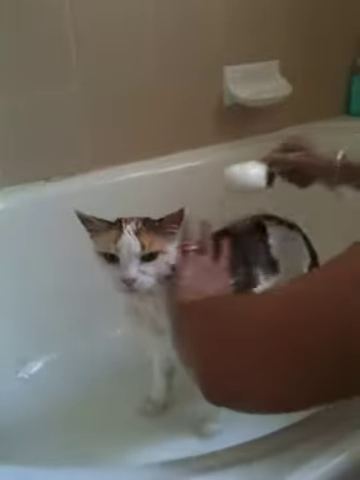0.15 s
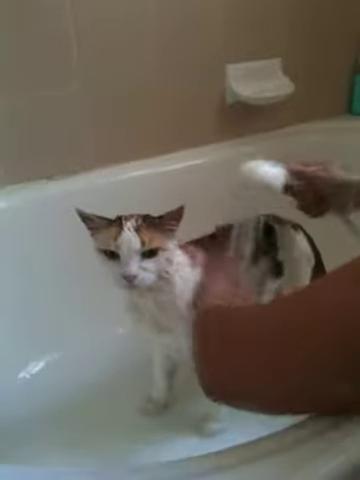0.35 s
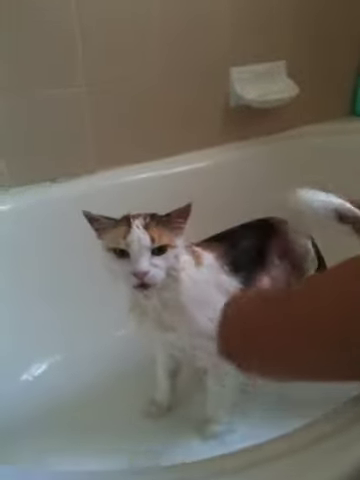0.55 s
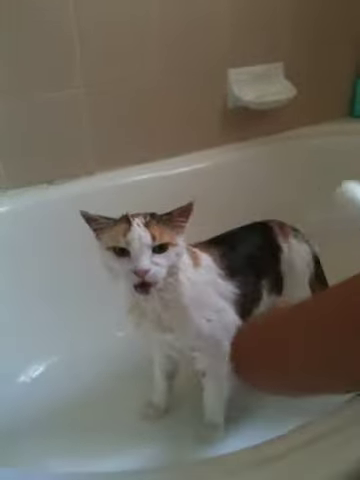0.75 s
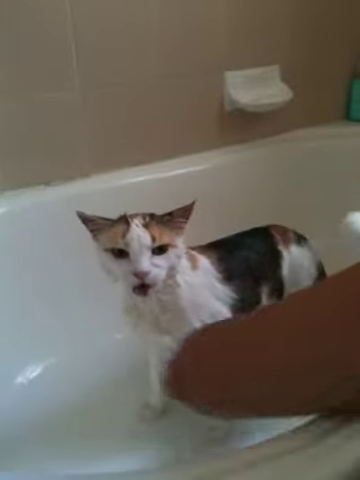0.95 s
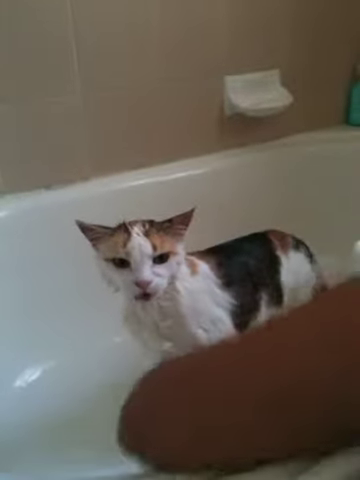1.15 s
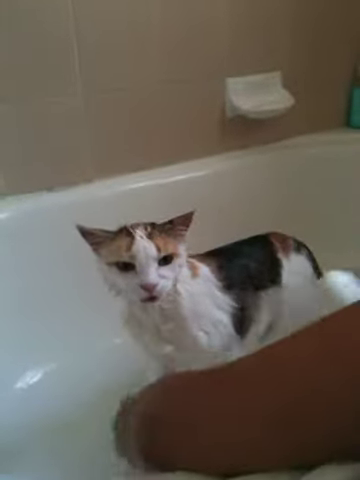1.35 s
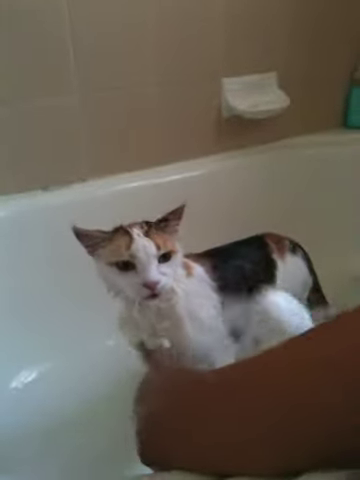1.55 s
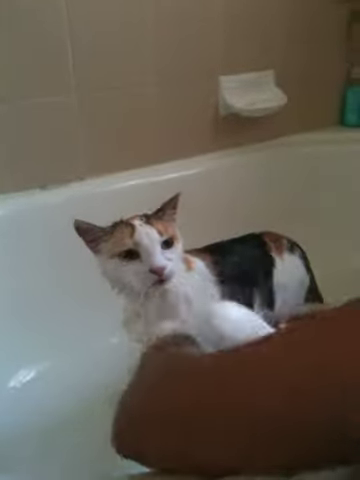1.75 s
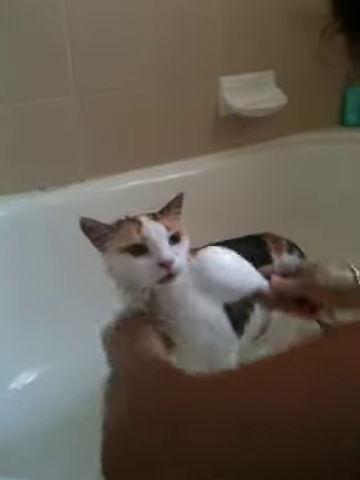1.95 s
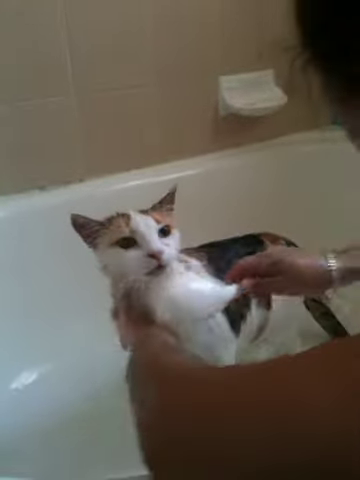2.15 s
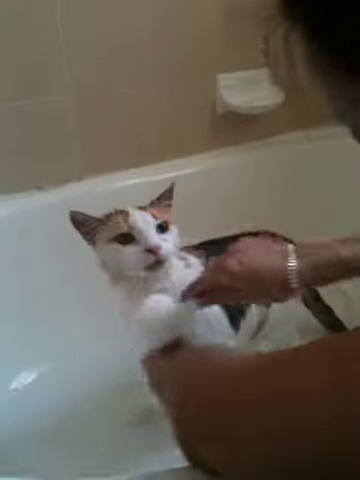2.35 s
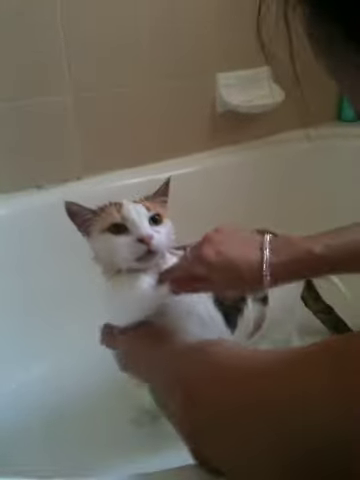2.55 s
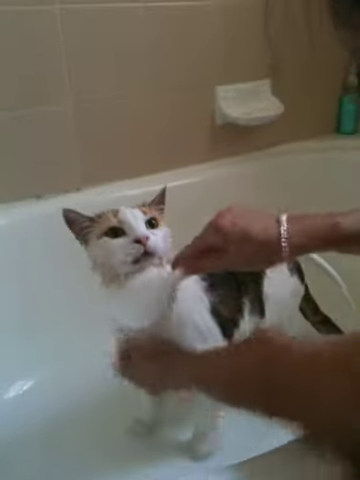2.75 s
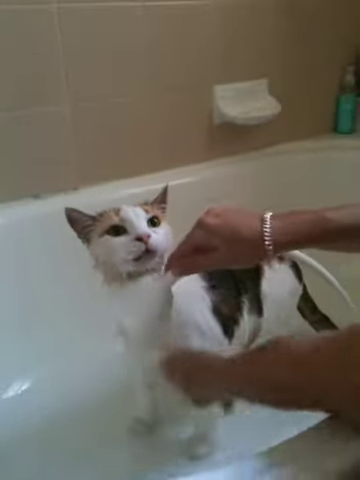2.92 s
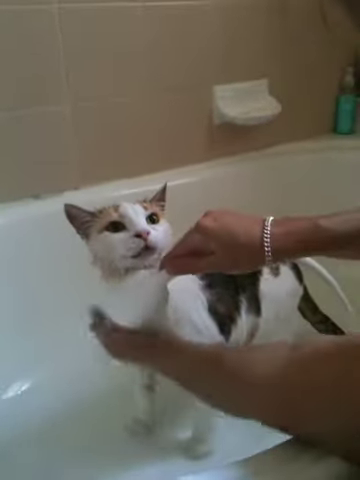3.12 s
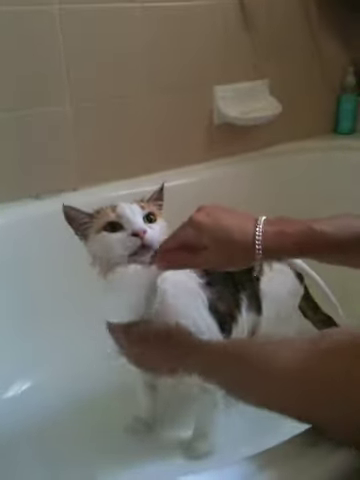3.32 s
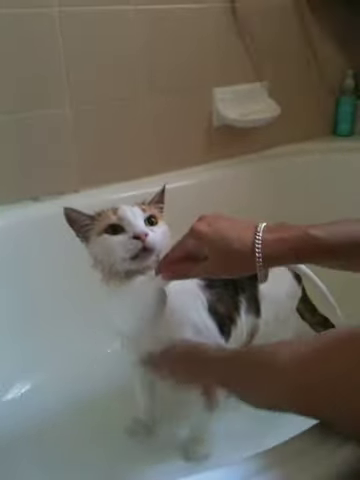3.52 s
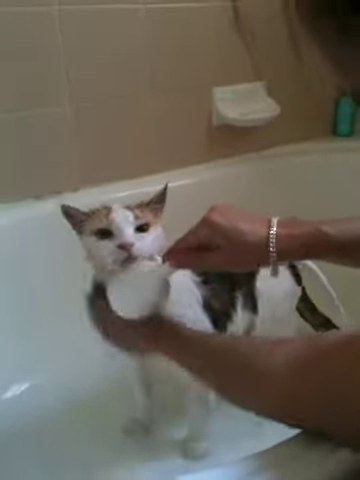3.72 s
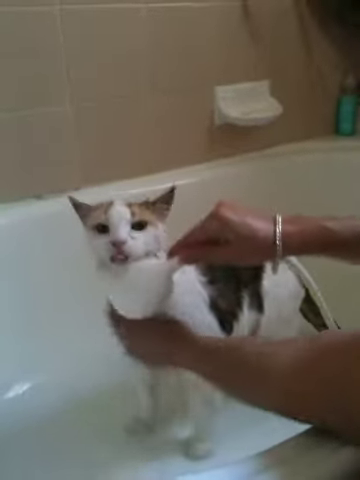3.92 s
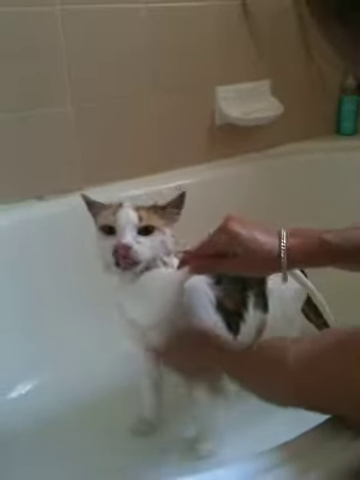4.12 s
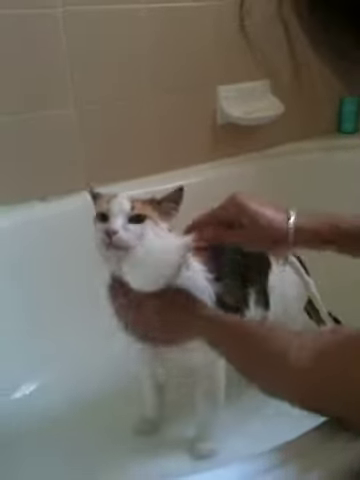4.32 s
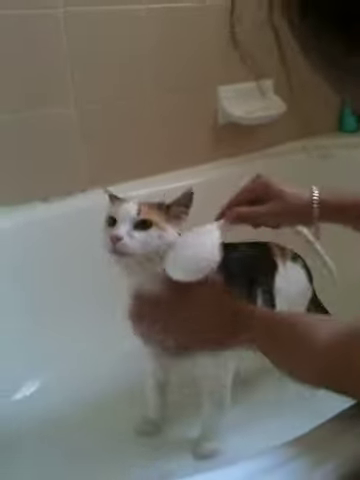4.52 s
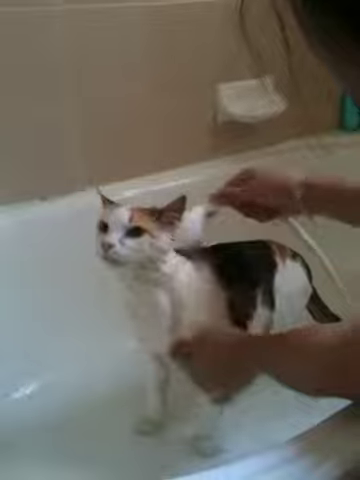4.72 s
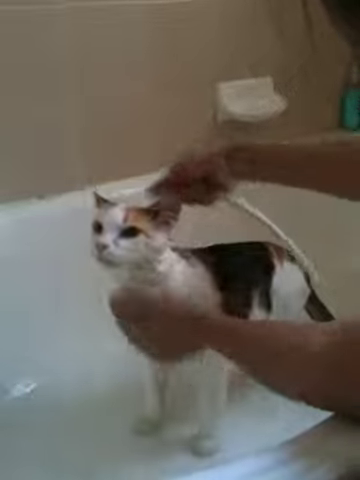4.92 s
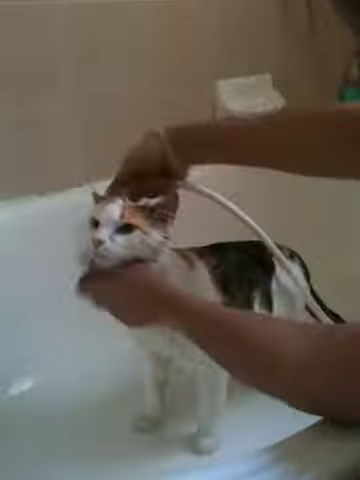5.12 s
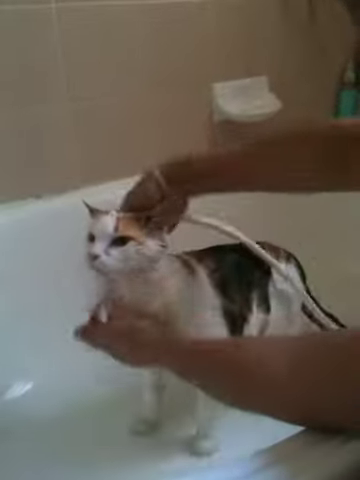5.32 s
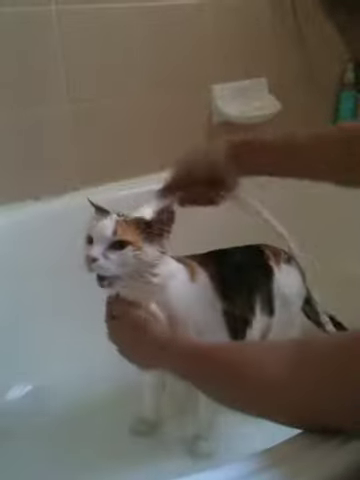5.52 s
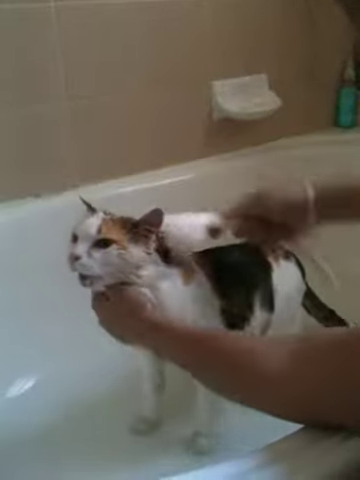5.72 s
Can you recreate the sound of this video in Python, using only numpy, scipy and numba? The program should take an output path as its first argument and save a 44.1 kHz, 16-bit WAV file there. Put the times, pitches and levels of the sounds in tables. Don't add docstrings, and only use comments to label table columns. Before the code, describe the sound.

In a small tiled bathroom, a bathed cat meows twice, seconds apart, over fine shower spray, wringing splashes, gurgles and soft tub thumps.

```python
import sys
import numpy as np
from scipy import signal
from scipy.io import wavfile
from scipy.ndimage import uniform_filter1d
from numba import njit

SR = 44100
rng = np.random.default_rng(int(sys.argv[2]) if len(sys.argv) > 2 else 0)


def pcm_store(signal):
    levels = np.round(np.clip(np.atleast_2d(signal), -1, 1) * 32767)
    wavfile.write(sys.argv[1], SR, levels.astype(np.int16).T)


def to_linear_factor(level_db):
    exponent = np.asarray(level_db, float) / 20
    return 10 ** exponent


N = 258760


def level(x, db):
    return x * to_linear_factor(db) / np.sqrt(np.mean(x ** 2))


def curves(table):
    s, *columns = np.transpose(table)
    return [np.interp(np.arange(N) / SR, s, c) for c in columns]


def walk(rate):
    hold = int(SR / rate)
    steps = np.repeat(rng.standard_normal(N // hold + 1), hold)
    return 1.332 * uniform_filter1d(uniform_filter1d(steps, hold), hold)[:N]


@njit
def svf(x, hz, width):
    y, b, l = np.empty(len(x)), 0., 0.
    g, k = np.tan(np.pi * hz / SR), width / hz
    for i in range(len(x)):
        v = (b + g * (x[i] - l)) / (1 + g * (g + k))
        b, l, y[i] = 2 * v - b, l + 2 * g * v, k * v
    return y


def steep_band(x, hz, width):
    hz, width = float(hz), float(width)
    return svf(svf(x, hz, width), hz, width)


def resonance(f, centre, width):
    return 1 / (1 + (2 * (f - centre) / width) ** 2) ** 2


def meow(table, ring, nasal):
    hz, effort_db, opening, bright_db = curves(table)
    start, end = table[0][0], table[-1][0]
    t = np.arange(N) / SR - start
    length = end - start
    gate = np.clip(t / 0.0284, 0, 1) * np.clip((length + 0.0206 - t) / 0.033, 0, 1)

    rasp_s = 0.0732
    fades = table[-1][2] < -40
    rasp = np.exp(-np.maximum(t, 0) / rasp_s) + np.exp(np.minimum(t - length, 0) / rasp_s) * fades
    tremble = (0.0018 + 0.01 * rasp) * walk(30) + (0.0022 + 0.01 * rasp) * walk(90)
    hz = hz * (1 + tremble)
    phase = 2 * np.pi * np.cumsum(hz) / SR

    shut_hz, open_hz = 1227, 2505
    mouth_hz = shut_hz + opening * (open_hz - shut_hz)
    second_hz, second_glide, throat_hz, throat_glide, throat_db = ring
    low_db, share, first_db, mouth_width = nasal
    voice = 0
    for k in range(1, 12):
        f = k * hz
        second = resonance(f, second_hz + second_glide * t, 896)
        throat = to_linear_factor(throat_db) * resonance(f, throat_hz + throat_glide * t, 1050)
        skirt = to_linear_factor(-17 - 5.5 * (k - 7))
        upper = to_linear_factor(bright_db + 2.585 * walk(14)) * (second + throat + skirt)
        mouth = resonance(f, mouth_hz, mouth_width) ** np.where(f > mouth_hz, 1.4, 1)
        gain = to_linear_factor(effort_db) * (mouth + upper)
        if k <= 2:
            gain = to_linear_factor(low_db + share * (effort_db + 39.5) + first_db * (k == 1))
        beat = 1 + min(0.15 * k, 0.45) * (walk(90) + 1j * walk(90))
        voice = voice + 0.8876 * gain * np.imag(beat * np.exp(1j * (k * phase + k * k)))

    breath = steep_band(rng.standard_normal(N), 1650, 960)
    breath_gain = to_linear_factor(effort_db) * (to_linear_factor(-14.5) + to_linear_factor(-1) * rasp)
    return gate * (voice + breath_gain * breath)


def cat():
    # (t/s, f/Hz, effort level/dB, mouth opening/0-1, brightness level/dB)
    calls = [
        [(0.6, 475.7, -65.5, 0.13, -15.5), (0.63, 476.7, -50, 0, -12.5), (0.685, 560.9, -47, 0.37, -6),
         (0.8, 611.1, -40.5, 0.72, -11), (1.04, 617.9, -32, 0.62, -16), (1.17, 607.9, -40, 0.64, -17),
         (1.28, 589.1, -47.5, .65, -17.5), (1.52, 558.7, -49.5, 0.72, -23), (1.59, 545.3, -59.5, 0, -24.5)],
        [(5.52, 315.4, -65.5, 0, -17), (5.56, 369.1, -56, 0, -24.5), (5.6, 420.7, -45, 0.24, -18.5),
         (5.645, 448.6, -35, 0.38, -14), (5.68, 489.1, -31, 0.22, -18.5), (5.725, 474.7, -18.5, 0.13, -23.5),
         (5.78, 458.5, -19, 0.23, -28.5), (5.82, 451.5, -18.5, 0.28, -54), (5.867, 451.9, -20, 0.17, -42)],
    ]
    # (second start f/Hz, glide/Hz per s, throat start f/Hz, glide/Hz per s, throat level/dB)
    rings = [
        (2977, 148, 4430, 2198, 1),
        (3400, -4800, 5092, -3700, -1.5),
    ]
    # (second partial level/dB, share of effort/1, first under second level/dB, mouth width f/Hz)
    nasals = [
        (-49, 0.29, -10, 1163),
        (-43.5, 0.517, -19, 814),
    ]
    return sum(meow(*call) for call in zip(calls, rings, nasals))


def swells(events, rise, column=0):
    t = np.arange(N) / SR
    power = 0
    for s, db, *rest in events:
        fall = rest[-1]
        offset_db = rest[0] if column else 0
        drop_db = 10 * np.maximum((t - s) / fall, (s - t) / (rise * fall))
        power = power + to_linear_factor(2 * (db + offset_db - drop_db))
    return power


def rinse():
    # (peak t/s, level/dB, mist level/dB, time to fall 10 dB t/s)
    strokes = [(.2, -53.5, -8.5, 0.11), (.82, -43, -4.5, 0.076), (1.08, -49, -10, 0.39),
               (1.48, -51, 5.5, 0.119), (1.58, -48, 6, .18), (2.05, -54, -1, -0.01),
               (2.54, -47.5, -2.5, 0.08), (2.66, -53, -16, 0.15), (3.02, -54, 0.5, 0.2259),
               (4.05, -45.5, -2, 0.0963), (4.22, -44.5, -2, 0.1087), (4.78, -45.5, -3, 0.0844),
               (4.84, -45.5, -7.5, -0.0684), (5.57, -54.5, -18, -0.22), (5.72, -51, -4, -0.17),
               (5.85, -45.5, -19, -0.14)]
    # (peak t/s, level/dB, mist level/dB, time to fall 10 dB t/s)
    flicks = [(.31, -52, 0, -0.14), (.518, -77.5, -0.5, 0.3), (.62, -45, -6.5, 0.16),
              (1.835, -50, -4.5, -0.08), (2.19, -50.5, 3.5, 0.2137), (2.42, -57.5, 2.5, 0.6),
              (3.11, -51, -2, 0.08), (3.31, -55, 7, 0.1), (3.39, -50, -3, 0.1255), (3.58, -41, -4, 0.15),
              (3.91, -71, -1, 4.52), (4.41, -55.5, -3.5, 0.21), (4.56, -45.5, -11, 0.06),
              (4.738, -52.5, 5.5, -0.0176), (5.28, -49, -5, 0.14), (5.36, -47, -5.5, 0.15),
              (5.445, -45, -3, 0.1138)]
    trickle_db = -58.5
    power, mist = (to_linear_factor(2 * trickle_db) + swells(strokes, 1.0897, k) + swells(flicks, 0.176, k)
                   for k in range(2))
    splash_db = 10 * np.log10(power)
    heavy_db = 0.544 * (-50 - splash_db)
    return splash_db, 10 * np.log10(mist / power), heavy_db


def water(spectrum, rate, spread_db, share, flicker_db, surge_db, low_db=0., high_db=0.):
    out = 0
    f, db = np.transpose(spectrum)
    for k, hz in enumerate(np.minimum(49 * 2 ** np.arange(0, 8.5, 1 / 3), 14600)):
        if k % 4 == 0:
            sizes = to_linear_factor(spread_db * np.minimum(rng.exponential(size=N), 3))
            hits = (rng.random(N) < rate * min(hz / 4000, 1) / SR) * sizes
            surge = walk(24.994)
        mix = np.sqrt(1 - share) * rng.standard_normal(N) + np.sqrt(share) * level(hits + 1e-9, 0)
        band_db = np.interp(np.log(hz), np.log(f), db) + 10 * np.log10(hz)
        band = level(steep_band(mix, hz, hz / 3), band_db)
        heavy = low_db * np.clip(np.log2(5000 / hz), 0, 1)
        mist = high_db * np.clip(np.log2(hz / 6200) * 1.92, 0, 1)
        out = out + band * to_linear_factor(heavy + mist + flicker_db * walk(18) + surge_db * surge)
    return out


def splashes():
    # (f/Hz, level/dB per Hz)
    spectrum = [(240, -26.5), (400, -7), (614, -35.5), (761, -6.5), (1000, -15.5), (1450, -5), (2190, -6),
                (3060, -9.5), (4920, -4.5), (6280, -1.5), (8400, -10), (10100, -7), (15500, -24.5)]
    splash_db, mist_db, heavy_db = rinse()
    unit_db = max(db for hz, db in spectrum if hz > 5000) + 40
    spray = water(spectrum, rate=700, spread_db=5.5, share=0.348, flicker_db=1.623, surge_db=1.37,
                  low_db=heavy_db, high_db=mist_db + 4.5)
    return to_linear_factor(splash_db - unit_db) * spray


def knocks(events, glide, rough, rise_s, wide):
    out = np.zeros(N + SR)
    t = np.arange(SR // 2) / SR
    for s, db, hz, t60 in events:
        tone = np.sin(2 * np.pi * hz * (t + glide * t ** 2 / t60))
        fizz = level(steep_band(rng.standard_normal(len(t)), hz, wide * hz), -4.5)
        shape = (1 - np.exp(-t / rise_s)) * np.exp(-np.log(1000) * t / t60)
        start = int(s * SR)
        out[start:start + len(t)] += to_linear_factor(db) * shape * ((1 - rough) * tone + rough * fizz)
    return out[:N]


def drops():
    # (t/s, peak level/dB, f/Hz)
    ticks = [(0.513, -30.5, 9700), (0.5951, -28, 6470), (2.62, -30, 6230), (2.6567, -30.5, 3877),
             (2.669, -30, 5980), (3.1041, -34, 10160), (3.279, -34.5, 9600), (3.3816, -33, 5690),
             (3.5123, -31, 6530), (3.5664, -31, 6340), (3.91, -41.5, 3233), (4.0015, -31.5, 6100),
             (4.0339, -35.5, 6098), (4.405, -33.5, 7100), (4.554, -24.5, 4934), (4.5982, -35.5, 6439),
             (4.727, -32.5, 6130), (4.727, -35, 11960), (5.2717, -35, 5970), (5.3553, -28.5, 4370),
             (5.4244, -39.5, 4976), (5.436, -31, 4510)]
    return knocks([(*tick, 0.0293) for tick in ticks], glide=0.247, rough=0.777, rise_s=0.00048, wide=0.72)


def gurgles():
    # (t/s, peak level/dB, f/Hz, t60 t/s)
    bubbles = [(.82, -35.5, 1286, 0.383), (1.56, -48.5, 790, 0.12), (1.76, -50.5, 352.4, 0.295),
               (2.2, -54.5, 897, 0.1917), (2.377, -40.5, 1834, 0.09), (2.465, -49, 1449, 0.235),
               (2.48, -38.5, 3400, 0.184), (2.52, -52, 733, 0.347), (2.6, -43.5, 1436, 0.288),
               (2.66, -44, 836, 0.332), (2.86, -41, 1636, 0.2), (3.075, -37, 1671, 0.144),
               (3.15, -47.5, 838, 0.236), (3.2, -40.5, 1900, 0.2125), (3.304, -40, 1352, 0.345),
               (3.43, -43, 1040, 0.154), (3.61, -35, 3090, 0.209), (3.91, -37, 3235, 0.196),
               (3.94, -44, 765, 0.094), (4.0, -47, 723.2, 0.27), (4.15, -44, 886.4, 0.093),
               (4.21, -35.5, 2387, 0.22), (4.3, -40.5, 804, 0.154), (4.667, -35.5, 1907, 0.171),
               (4.667, -43, 976, 0.176), (4.78, -41, 3137, 0.41), (4.873, -43, 1513, 0.202),
               (5.2, -43.5, 799, 0.24), (5.21, -37, 4300, 0.092)]
    return knocks(bubbles, glide=0.16, rough=0.818, rise_s=0.0082, wide=0.308)


def thumps():
    # (t/s, peak level/dB, f/Hz, t60 t/s)
    blows = [(.393, -71, 347.9, 0.264), (.573, -54, 330.4, 0.39), (.8, -51.5, 183.3, 0.57),
             (1.39, -42.5, 223.5, 0.19), (1.408, -35.5, 372, 0.137), (1.76, -50, 189.8, 0.21),
             (1.99, -41, 205.1, 0.238), (2.05, -59, 201.4, 0.1626), (2.16, -50.5, 218.2, 0.305),
             (2.97, -49.5, 211.6, 0.406), (3.57, -39, 193.8, 0.226), (3.933, -56.5, 203.8, 0.39),
             (4.03, -52.5, 190.6, 0.87), (4.155, -44, 208.2, 0.233), (4.17, -45.5, 389.5, 0.224),
             (4.3, -42, 201.8, 0.134), (4.729, -44.5, 348.6, 0.273), (4.75, -47.5, 164.4, 0.304),
             (5.227, -53.5, 328, 0.213)]
    return knocks(blows, glide=0.0061, rough=0.526, rise_s=0.00826, wide=0.54)


def shower():
    # (f/Hz, level/dB per Hz)
    spectrum = [(24, -63), (40, -51), (183, 0), (535, -11), (1080, -14.5), (1850, -4), (2450, -3.5),
                (3100, 2), (3840, -8.5), (6160, -3), (10400, -14.5), (11800, -29), (12700, -22),
                (14400, -14.5), (15500, -18)]
    spray = water(spectrum, rate=650, spread_db=2.0, share=0.157, flicker_db=1.33, surge_db=0.1309)
    return level(spray, -53)


def nozzle():
    # (f/Hz, width f/Hz, level/dB)
    whistles = [
        (3026, 14, -63),
        (1796, 522.7, -62),
    ]
    out = 0
    for hz, width, db in whistles:
        hiss = level(svf(rng.standard_normal(N), float(hz), float(width)), db)
        out = out + hiss * to_linear_factor(0.5533 * walk(2.37))
    turned_away = np.clip(np.arange(N) / SR - 3.94, 0, 1)
    return out * to_linear_factor(-6.5 * turned_away)


def rumble():
    # (peak t/s, level/dB, time to fall 10 dB t/s)
    surges = [(.21, -77, .24), (.88, -71.5, .24), (1.19, -77.5, .28), (1.93, -84, .14), (4.8, -77, .12),
              (5.86, -82, .04)]
    floor_db = -94
    envelope = np.sqrt(swells(surges, 0.92) + to_linear_factor(2 * floor_db))
    return envelope * level(steep_band(rng.standard_normal(N), 80.4, 27.0), 0)


@njit
def walls(x, lags, gain, damp):
    line, soft, out = np.zeros((8, 4096)), np.zeros(8), np.zeros(len(x))
    for i in range(len(x)):
        total = 0.
        for k in range(8):
            soft[k] += (1 - damp) * (gain[k] * line[k, (i - lags[k]) & 4095] - soft[k])
            total += soft[k]
            out[i] += soft[k] * (1 - 2 * (k & 1))
        for k in range(8):
            line[k, i & 4095] = x[i] + soft[k] - total / 4
    return out


def bathroom(send):
    t60_s, damp = 0.465, 0.253
    lags = rng.integers(500, 2200, 8)
    return walls(send + 1e-18, lags, to_linear_factor(-60 * lags / SR / t60_s), damp)


def scene():
    voice = cat()
    wet = splashes() + drops() + gurgles() + thumps()
    tiles = bathroom(to_linear_factor(-9) * voice + to_linear_factor(-12.5) * wet)
    return (to_linear_factor(2.5) * voice + wet + shower() + nozzle() + rumble() + tiles)[None]


def thin_treble(x):
    f, _, z = signal.stft(x, SR, nperseg=2048, noverlap=1024)
    around = uniform_filter1d(np.abs(z), size=61, axis=1)
    small = uniform_filter1d(np.abs(z), size=3, axis=1) < 1.42 * around
    weak = around < to_linear_factor(-77.5)
    z = z * ~(small & weak & (f[:, None] > 11800))
    return signal.istft(z, SR, nperseg=2048, noverlap=1024)[1][:, :N]


def low_pass(x):
    return signal.sosfilt(signal.butter(12, 15710, fs=SR, output="sos"), x)


def record(dry):
    bass_cut = signal.butter(2, 90, "high", fs=SR, output="sos")
    x = thin_treble(signal.sosfilt(bass_cut, dry))
    return low_pass(x)


dry = scene()
out = record(dry)
pcm_store(out)
```